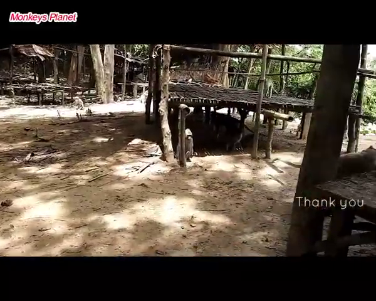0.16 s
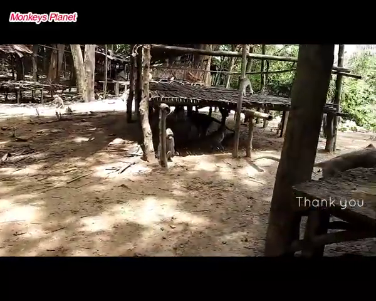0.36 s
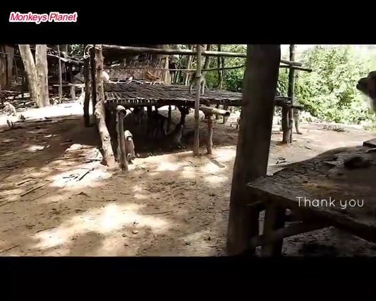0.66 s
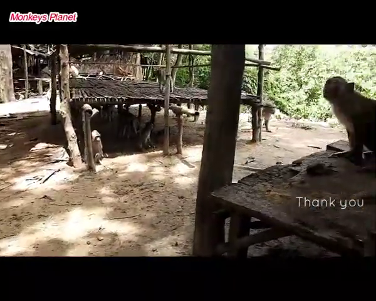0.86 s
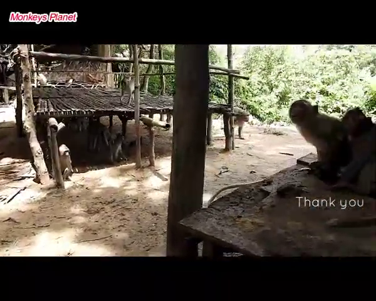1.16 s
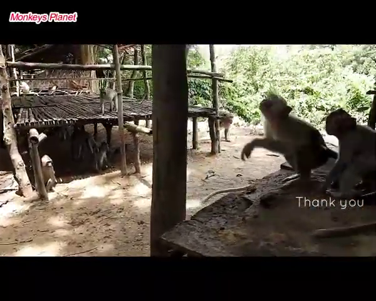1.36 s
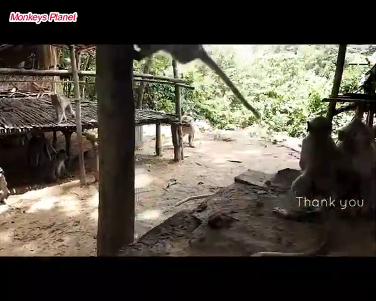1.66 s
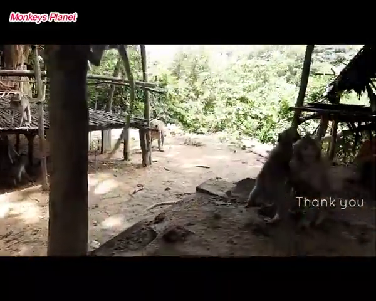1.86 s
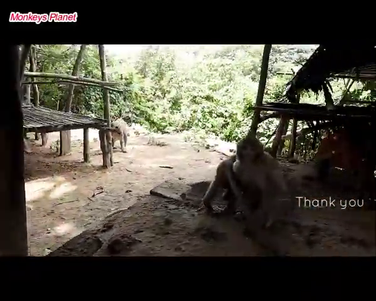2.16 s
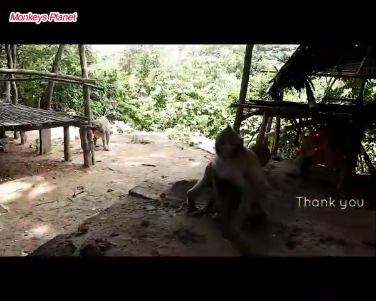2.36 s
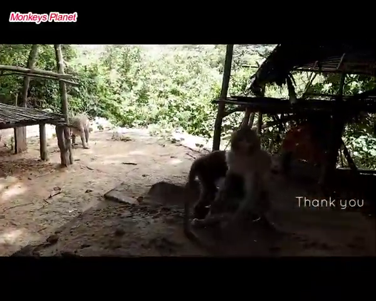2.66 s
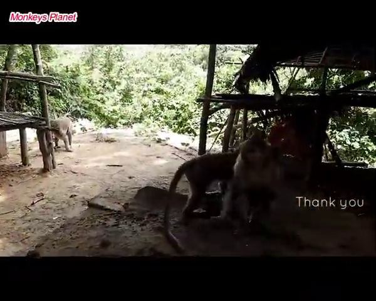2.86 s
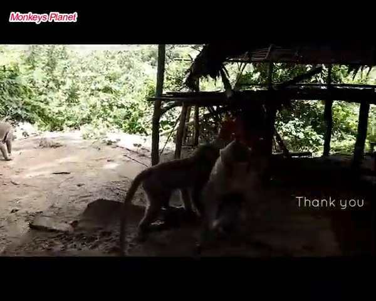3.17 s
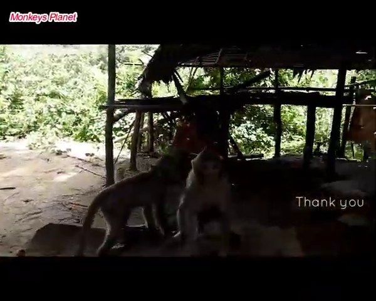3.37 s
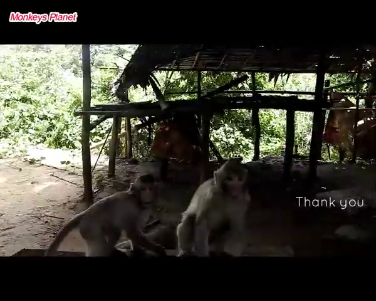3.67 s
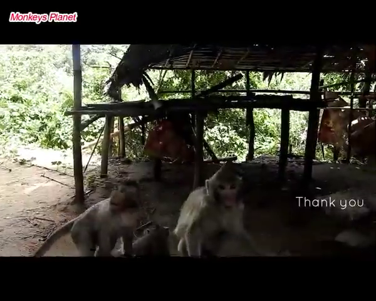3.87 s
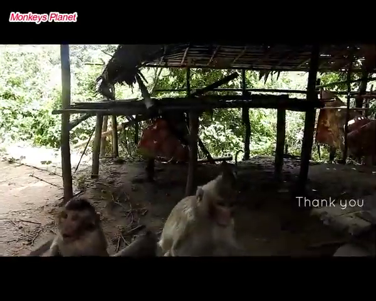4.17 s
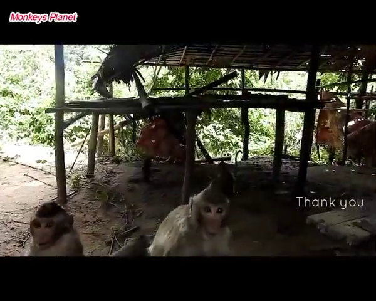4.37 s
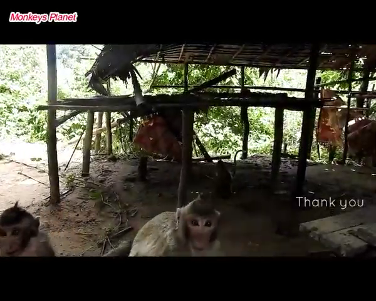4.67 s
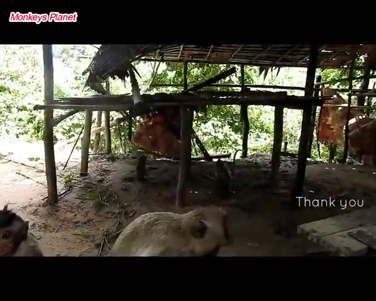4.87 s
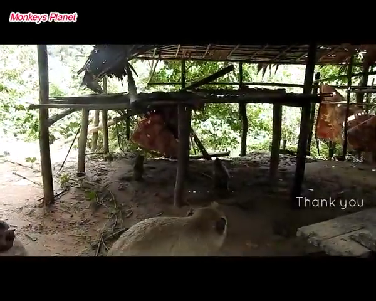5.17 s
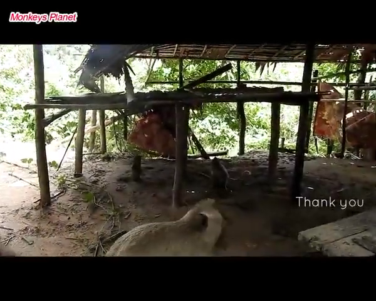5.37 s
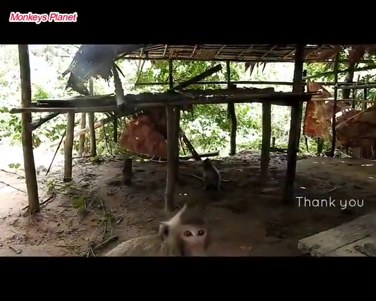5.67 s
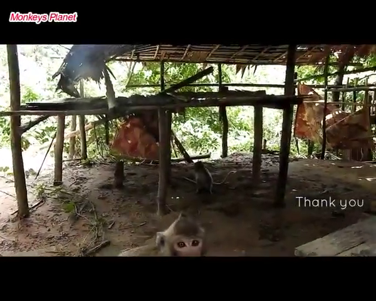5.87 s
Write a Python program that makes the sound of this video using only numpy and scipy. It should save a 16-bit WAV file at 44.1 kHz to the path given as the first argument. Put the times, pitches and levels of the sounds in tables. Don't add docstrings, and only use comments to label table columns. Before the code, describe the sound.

A young monkey shrieks harshly and yelps close by for four seconds outdoors, then only heavy wind buffets and small ticks remain.

```python
import sys
import numpy as np
from scipy import signal
from scipy.fft import rfft, irfft, next_fast_len
from scipy.io import wavfile
from scipy.ndimage import uniform_filter1d

SR = 44100
rng = np.random.default_rng(int(sys.argv[2]) if len(sys.argv) > 2 else 0)


def amp(db):
    return 10 ** (np.asarray(db, float) / 20)


def write(x):
    x = np.atleast_2d(x).T
    wavfile.write(sys.argv[1], SR, np.round(np.clip(x, -1, 1) * 32767).astype(np.int16))


N = 265638

USUAL_EFFORT_DB = -17
TURN_S = 2.4
CENTRED_S = 2.75


def evened(x):
    return x / np.sqrt(np.mean(x ** 2) + 1e-20)


def read(points, hz):
    f, value = np.transpose(points)
    return np.interp(np.log(hz + 1), np.log(f + 1), value)


def add(mix, start_s, sound):
    part = mix[..., max(round(start_s * SR), 0):][..., :sound.shape[-1]]
    part += sound[..., :part.shape[-1]]


def drift(count, smooth_s):
    size = max(round(smooth_s * SR), 1)
    return evened(uniform_filter1d(uniform_filter1d(rng.standard_normal(count), size), size))


def resonate(x, hz, width_hz):
    turn = np.exp(2j * np.pi * np.cumsum(hz * np.ones(len(x))) / SR)
    r = np.exp(-np.pi * width_hz / SR)
    low = signal.lfilter([1 - r], [1, -r], x / turn + 1e-18)
    return 2 * (turn * signal.lfilter([1 - r], [1, -r], low)).real


def monkey():
    # hz, level_db
    capsule = [(1400, -14), (2000, -1), (2300, 0.5), (13000, -0.5), (16000, -3)]
    # hz, difference_db
    port_balance = [(1400, 3), (2900, -5.5), (5500, 1), (15000, 0.5)]
    right_lead_s = 2.6e-5
    size = next_fast_len(N)
    hz = np.fft.rfftfreq(size, 1 / SR)
    voice = irfft(rfft(monkey_voice(), size) * amp(read(capsule, hz)), size)[:N]

    half = amp(read(port_balance, hz) / 2) * np.exp(-1j * np.pi * hz * right_lead_s)
    aside = irfft(rfft(voice, size) * np.array([half, 1 / half]), size)[:, :N]
    direct = np.where(np.arange(N) < CENTRED_S * SR, aside, voice)

    scatter = rng.standard_normal(700) * np.exp(-np.arange(700) / 250) * [[1], [-1]]
    near = signal.oaconvolve(voice[None], scatter / np.linalg.norm(scatter[0]), axes=1)[:, :N]
    return direct + amp(-6.5) * near + amp(-11.0) * shelter(voice)


def monkey_voice():
    # time_s, scream_effort_db, whistle_pitch_hz, whistle_level_db
    opening = [(0, -29, 5400, -21), (.045, -22.5, 5800, -23.5), (.095, -13, 6080, -34),
               (.11, -7.5, 5310, -43), (0.191, -12.5, 5550, -39), (.3, -18.5, 5082, -50),
               (.38, -15.5, 4910, -51), (0.464, -11, 4794, -61), (.485, -24, 4700, -50)]
    wavering = [(.735, -33, 5030, -29.5), (.765, -29, 5380, -20), (.83, -31.5, 5184, -29.5),
                (.91, -28, 5493, -20.5), (0.959, -18.5, 5480, -38), (1.019, -5.5, 5255, -23),
                (1.035, -26, 5310, -28.5), (1.069, -33, 5120, -26)]
    warbling = [(1.06, -21, 5844, -19.5), (1.111, -21.5, 5020, -24), (1.143, -18.5, 5344, -23),
                (1.151, -20, 6250, -20), (1.185, -19.5, 5650, -18), (1.2, -18, 4956, -24.5),
                (1.26, -14, 5214, -22), (1.31, -15, 5460, -23)]
    long_shriek = [(1.3, -15, 5530, -32), (1.421, -9.5, 5500, -49), (1.5, -7.5, 5860, -36),
                   (1.602, -13, 5720, -38), (1.69, -9.5, 5884, -45), (1.74, -14, 4964, -45),
                   (1.789, -15.5, 5355, -55), (1.813, -39, 5140, -48)]
    sinking = [(1.925, -42, 5696, -31), (1.96, -30, 5525, -23.5), (2.001, -22.5, 5435, -34),
               (2.04, -12, 5565, -21.5), (2.1, -13, 4890, -22), (2.16, -16, 5180, -24),
               (2.2, -26, 4760, -25), (2.281, -23.5, 4845, -25), (2.299, -52, 4590, -31)]
    first_yelp = [(2.472, -69, 6170, -26.5), (2.493, -44, 6640, -14.5), (2.513, -26, 6640, -17),
                  (2.522, -21.5, 5630, -27), (2.573, -23.5, 5750, -25), (2.581, -27, 5166, -20),
                  (2.615, -76, 5380, -24), (2.647, -60, 4400, -33)]
    second_yelp = [(2.879, -55, 6490, -22.5), (2.897, -35, 5940, -19.5), (2.916, -19.5, 5810, -22),
                   (2.97, -24.5, 5560, -27), (2.995, -53, 5740, -22.5), (3.02, -69, 4700, -38)]
    arched = [(3.157, -66, 7200, -31), (3.172, -30.5, 6664, -21), (3.188, -32, 5846, -25),
              (3.215, -26, 6390, -19), (3.255, -18, 6610, -17.5), (3.278, -19, 5710, -21.5),
              (3.342, -24, 4700, -24.5), (3.362, -46, 4980, -26), (3.381, -60, 4760, -37)]
    last = [(3.517, -55, 5510, -22), (3.528, -58, 5960, -20.5), (3.556, -17, 5220, -20.5),
            (3.63, -19, 5286, -45), (3.769, -21.5, 5216, -41), (3.84, -16.5, 5360, -29),
            (3.889, -17, 5170, -35), (3.939, -23, 3900, -37), (3.975, -38, 3720, -43)]
    # pitch_band_start_db, pitch_band_end_db, throat_db, lips_db
    postures = [(-9.5, -13, -2.5, -4), (-14.5, -19.5, -4.5, -6.5), (-20.5, -11.5, -1.5, -10),
                (-14, -15.5, -3, -15), (-6.5, -25.5, -3.5, -6), (-19, -16, -9, -12), (-16, -12, -13, -13.5),
                (-6.5, -19.5, -6, -9), (-12, -13, -2, -8)]
    octaves_db = [-12, -9, -13, -14, -10, -15, -20, -17, -11]
    # start_s, length_s, start_hz,
    # end_hz, peak_db
    side_tones = [(.019, .062, 8500, 8900, -20.5), (.742, 0.042, 6500, 7450, -24),
                  (.808, 0.073, 7280, 7350, -21.5), (.802, 0.058, 8900, 8700, -22.5),
                  (.848, 0.051, 8850, 8650, -20), (.892, 0.032, 8000, 8150, -23),
                  (.914, 0.031, 7550, 7600, -17.5), (.928, 0.032, 8600, 8900, -16),
                  (.825, .04, 2100, 2000, -35), (.945, 0.057, 2500, 2400, -34),
                  (.958, 0.044, 6000, 7700, -30), (1.06, 0.043, 9800, 9300, -20),
                  (1.124, 0.066, 9450, 9600, -18.5), (1.19, 0.028, 11000, 9250, -21),
                  (1.15, 0.061, 3800, 3700, -32.5), (1.16, .03, 2450, 2400, -29),
                  (1.215, 0.045, 2700, 2750, -27), (1.216, 0.035, 8050, 6200, -23),
                  (1.225, .05, 7500, 6600, -18), (2.1, 0.026, 7330, 7260, -13),
                  (1.1, .035, 5700, 5400, -22.5), (1.715, 0.0604, 7250, 6950, -12),
                  (1.67, .055, 2950, 2900, -22.5), (1.39, 0.079, 2650, 2300, -22),
                  (.965, .04, 8800, 8700, -22), (.95, 0.043, 6500, 6400, -26),
                  (1.13, 0.046, 8600, 8400, -24), (1.97, .04, 6100, 7000, -25),
                  (2.17, 0.0506, 6600, 7600, -25), (1.94, .04, 8300, 8200, -24),
                  (1.5, 0.068, 9200, 8400, -25),
                  (2.52, 0.055, 4300, 4250, -34.5), (2.51, 0.05, 9600, 10200, -31),
                       (2.575, 0.0145, 6300, 6850, -20), (2.915, 0.012, 7000, 7600, -24),
                       (2.935, 0.027, 7600, 6700, -21), (3.59, 0.045, 8700, 7550, -19),
                       (3.555, .04, 7500, 7900, -25), (3.675, 0.052, 6950, 6650, -18),
                       (3.73, .06, 6800, 6500, -22.5), (2.163, 0.043, 8500, 7800, -14),
                       (3.905, 0.04, 8800, 6500, -18), (1.743, 0.063, 4450, 4350, -22.5),
                       (1.973, 0.029, 8150, 9350, -16.5), (1.985, 0.029, 6200, 6750, -14.5),
                       (2.012, .03, 10800, 10750, -24), (2.527, 0.053, 7400, 7450, -15.5),
                       (2.955, 0.026, 7150, 6900, -20), (3.81, .03, 7800, 6300, -18),
                       (2.9, 0.076, 7200, 6000, -28), (3.6, 0.073, 6300, 5000, -23),
                       (2.578, .022, 10350, 10400, -22.5), (.955, .02, 13000, 13300, -28),
                       (3.56, .04, 4900, 6000, -21), (3.934, 0.042, 4900, 4000, -28.5)]
    # start_s, length_s, start_hz, end_hz, peak_db
    stacks = [
        (1.014, 0.058, 2680, 2540, -17),
        (2.097, 0.034, 2430, 2400, -28),
        (3.185, 0.0905, 2156, 2200, -20),
    ]
    # hz, level_db
    stack_colour = [(2400, -5), (4600, -17.5), (6500, 0.5), (7600, 16), (8800, -5.5), (11000, -9.5)]
    # (time_s, pitch_hz)
    third_cycles = [
        (-22.5, [(2.135, 1760), (2.165, 1710), (2.2, 1590), (2.285, 1620)]),
        (-21.5, [(3.255, 1800), (3.29, 1720), (3.345, 1640)]),
        (-16.5, [(3.82, 1680), (3.865, 1740), (3.89, 1700), (3.925, 1350), (3.96, 1270)]),
    ]

    voice = np.zeros(N)
    shrieks = (opening, wavering, warbling, long_shriek, sinking, first_yelp, second_yelp, arched, last)
    for rows, posture, octave_db in zip(shrieks, postures, octaves_db):
        add(voice, *scream(rows, *posture))
        add(voice, *whistle(rows, octave_db))
    for start_s, length_s, start_hz, end_hz, db in stacks:
        partials = [(k, read(stack_colour, k * start_hz)) for k in range(1, 6)]
        glide_hz = np.linspace(start_hz, end_hz, round(length_s * SR))
        add(voice, start_s, tone(glide_hz, db, partials, 0.53))
    for start_s, length_s, start_hz, end_hz, db in side_tones:
        glide_hz = np.linspace(start_hz, end_hz, round(length_s * SR))
        waver_hz = 70 * drift(len(glide_hz), .004)
        add(voice, start_s, tone(glide_hz + waver_hz, db, [(1, 0)], .3))
    for db, curve in third_cycles:
        add(voice, *thirds(db, curve))
    return voice


def scream(rows, low_start_db, low_end_db, throat_db, lips_db):
    # time_s, resonance_hz
    mouth_curve = [(0, 7420), (.12, 7140), (.24, 7760), (.36, 7170), (.74, 7350), (.85, 8220), (.97, 7780),
                   (1.14, 7940), (1.3, 7600), (1.45, 7380), (1.65, 7800), (1.73, 7280), (1.8, 7250),
                   (2.0, 7900), (2.12, 7650), (2.28, 7470), (2.55, 7430), (2.91, 7970), (2.97, 7100),
                   (3.22, 6930), (3.31, 7490), (3.6, 7440), (3.75, 6640), (3.87, 8100), (3.95, 6450)]
    s, effort_db, whistle_hz, _ = np.transpose(rows)
    start_s = s[0]
    aside = start_s < TURN_S
    t = np.arange(start_s, s[-1], 1 / SR)
    count = len(t)
    effort_db = np.interp(t, s, effort_db)
    pitch_hz = np.interp(t, s, whistle_hz) / 2
    mouth_hz = np.interp(t, *np.transpose(mouth_curve))
    low_db = np.linspace(low_start_db, low_end_db, count)

    push_db = np.clip(effort_db - USUAL_EFFORT_DB, -12, 10)
    throat_db = throat_db - 0.19 * push_db
    lips_db = lips_db - 0.8 * push_db

    pitch_hz = pitch_hz * (1 + .025 * drift(count, .015))
    turns = np.cumsum(pitch_hz * (1 + .07 * drift(count, .0008))) / SR
    folds = sum(np.cos(2 * np.pi * k * turns) for k in range(1, 5))
    folds = folds * (1 + .7 * drift(count, .0005))
    drive = (.6 if aside else .15) * evened(folds) + .6 * rng.standard_normal(count)

    focus = np.clip((low_db + 20) / 12, .1, .65) if aside else .1
    pitch_band = .7 * evened(resonate(drive, pitch_hz, 750)) + .7 * locks(drive, pitch_hz * 1.02, 200)
    chest = evened(resonate(drive, 2900 if aside else 2300, 2400))
    low = focus * evened(pitch_band) + .6 * chest

    torn = .65 if aside else .35
    throat = evened(evened(resonate(drive, 4900, 2300)) + torn * locks(drive, 5200, 600))
    mouth = evened(evened(resonate(drive, mouth_hz * .99, 2400)) + torn * locks(drive, mouth_hz, 550))

    air_level = .26 if start_s < 1.9 else .55 if start_s < CENTRED_S else .2
    air = air_level * amp(4 * drift(count, .02)) * evened(resonate(drive, 13400, 4500))
    lip_band = evened(resonate(drive, 5600 + .6 * mouth_hz, 2000))
    lips = evened(lip_band + .7 * torn * locks(drive, 5000 + .6 * mouth_hz, 800) - air)

    voice = amp(low_db) * low - amp(throat_db - 8.5) * throat + mouth - amp(lips_db - 5.0) * lips
    flutter = amp(0.42 * drift(count, 0.027))
    return start_s, amp(effort_db + 1.5) * flutter * voice * signal.windows.tukey(count, .04)


def locks(drive, hz, spread_hz):
    count = len(drive)
    out = 0
    for _ in range(2):
        hops = np.cumsum(rng.random(count) < 55 / SR)
        hop_hz = uniform_filter1d(rng.standard_normal(count)[hops], size=220) * spread_hz
        hop_hz = hop_hz + 60 * drift(count, 0.004)
        out = out + resonate(drive, hz + hop_hz, 230) * amp(4.0 * drift(count, .008))
    return evened(out)


def whistle(rows, octave_db):
    s, *columns = np.transpose(rows)
    t = np.arange(s[0], s[-1], 1 / SR)
    effort_db, pitch_hz, db = (np.interp(t, s, c) for c in columns)
    ragged = np.minimum(amp(effort_db - USUAL_EFFORT_DB), 1)
    waver_hz = 45 * drift(len(t), .006) + ragged * 160 * drift(len(t), .003)
    tremble_db = (1.5 + ragged * 4) * drift(len(t), .007)
    octave_db = octave_db - np.maximum(pitch_hz - 5500, 0) / 150
    return s[0], tone(pitch_hz + waver_hz, db + tremble_db, [(1, 0), (2, octave_db)], .03)


def tone(pitch_hz, db, partials, edge):
    count = len(pitch_hz)
    turns = np.cumsum(pitch_hz + 50 * drift(count, .002)) / SR
    wave = sum(amp(k_db + 1.34 * drift(count, 0.0023)) * np.sin(2 * np.pi * k * turns)
               for k, k_db in partials)
    return amp(db) * wave * signal.windows.tukey(count, edge)


def thirds(db, curve):
    # hz, level_db
    thirds_colour = [(2600, -5.5), (3400, -14), (5000, -8), (6700, 0), (8300, -2.5), (10000, -11),
                     (11500, -19)]
    s, hz = np.transpose(curve)
    pitch_hz = np.interp(np.arange(s[0], s[-1], 1 / SR), s, hz)
    count = len(pitch_hz)
    out = 0
    for k in range(2, 8):
        level = amp(read(thirds_colour, k * pitch_hz) + 2.1 * drift(count, 0.0068))
        ragged_hz = k * pitch_hz + 95 * drift(count, 0.0026)
        out = out + level * tone(ragged_hz, db, [(0.99, 0)], 0.35)
    return s[0], out


def shelter(x):
    # hz, t60_s
    decay = [(2000, .4), (7000, .45), (12000, .2)]
    taps = np.zeros((2, SR))
    at = np.arange(200, SR - 20, 20) + rng.integers(0, 20, (2, (SR - 201) // 20))
    np.put_along_axis(taps, at, rng.choice([-1., 1.], at.shape), 1)
    hz, t, z = signal.stft(taps, SR, nperseg=256)
    tail = signal.istft(z * amp(-60 * t / read(decay, hz)[:, None]), SR, nperseg=256)[1]
    return signal.fftconvolve(x[None], tail / np.linalg.norm(tail[0]), axes=1)[:, :N]


def wind():
    # time_s, left_db, right_db
    steady = [(0.0, -34.5, -55), (0.5, -32.5, -35), (1.0, -21, -25.5), (1.5, -24, -53), (2.0, -31, -51),
              (2.5, -27.5, -35), (3.0, -41, -36), (3.5, -29.5, -47), (4.0, -22.5, -28.5), (4.5, -19, -23),
              (5.0, -19, -30.5), (5.5, -18.5, -16), (6.0, -12.5, -35)]
    # hz, density_db
    rumble_colour = [(12, -48), (20, -40.5), (59, 22), (102, 1), (177, -3), (222, -35), (258, -27),
                     (400, -45), (520, -68), (880, -120)]
    # peak_s, peak_db, width_s
    left_buffets = [(0.735, -13, 0.023), (0.766, -11, 0.018), (.81, -16.5, .02), (0.872, -20.5, .028),
                    (.938, -14.5, 0.04), (1.402, -11.5, 0.018), (1.64, -19.5, .03), (1.888, -15.5, .015),
                    (2.014, -19.5, .012), (2.142, -13, 0.02), (2.281, -12.5, 0.012), (2.441, -17, 0.037),
                    (2.7, -21.5, .02), (2.827, -13.5, 0.011), (2.917, -8, 0.018), (3.021, -13.5, 0.016),
                    (3.564, -7, 0.024), (4.252, -7.5, 0.012), (4.286, -12.5, 0.023), (4.359, -7, .04),
                    (4.487, -5, 0.016), (5.531, -2.5, 0.017), (5.56, -4.5, 0.024), (5.586, -4, 0.015),
                    (5.718, -11.5, 0.061), (5.78, -.5, 0.051), (5.993, -5.5, 0.029)]
    # peak_s, peak_db, width_s
    right_buffets = [(0.711, -9, 0.006), (0.735, -10.5, .012), (1.315, -16, 0.028), (2.843, -22, 0.022),
                     (3.577, -9.5, 0.031), (3.635, -11.5, .03), (3.702, -12, 0.065), (3.757, -13, 0.022),
                     (3.959, -12, 0.024), (4.344, -7.5, 0.06), (4.376, -12, 0.012), (4.69, -14, 0.019),
                     (4.807, -15, 0.035), (5.261, -16.5, .032), (5.407, -11.5, 0.044), (5.442, -11.5, .013),
                     (5.529, -15.5, 0.029), (5.592, -1.5, .028), (5.618, -4.5, 0.019), (5.69, -7.5, 0.084),
                     (5.754, -4, 0.03), (5.818, -0.5, 0.046), (5.842, 0, 0.013), (5.944, -18, 0.019),
                     (6.003, -1, 0.013)]
    s, *levels_db = np.transpose(steady)
    out = two_port_noise(rumble_colour, [(1000, 0.39)], patchy_db=4.5)
    for port, db, buffets in zip(out, levels_db, (left_buffets, right_buffets)):
        port *= amp(np.interp(np.arange(N) / SR, s, db) + 4.5 * drift(N, .02) - 2.5)
        for peak_s, peak_db, width_s in buffets:
            add(port, peak_s - 1.5 * width_s, buffet(peak_db, width_s))
    spit = np.clip(out - .35, 0, .25) ** 2 * amp(5.1 * drift(N, 0.01))
    spit = signal.lfilter(*signal.butter(1, [330, 1300], "band", fs=SR), spit)
    out = .75 * np.tanh(out / .75) + amp(-1) * spit
    return signal.lfilter(*signal.butter(5, 46, "high", fs=SR), out)


def buffet(peak_db, width_s):
    eddy_hz = 142.36 + 3.0 * peak_db
    t = np.arange(-1.5 * width_s, 2.7 * width_s, 1 / SR)
    wobble = 1 + 0.317 * drift(len(t), 0.00473)
    phase = 2 * np.pi * (rng.random() + np.cumsum(eddy_hz * wobble) / SR)
    rough = resonate(rng.standard_normal(len(t)), 1.15 * eddy_hz, 110)
    rough = evened(resonate(rough, 1.15 * eddy_hz, 110))
    eddies = .4 * rough + .85 * np.sin(phase) + amp(0.99 * peak_db - 10) * np.cos(2 * phase)
    return amp(peak_db + 3.5) * np.exp(-2.4 * (t / width_s) ** 2) * eddies


def two_port_noise(colour, likeness, patchy_db):
    frames, hz = N // 256 + 5, np.fft.rfftfreq(1024, 1 / SR)
    a, b, c, d, patches = rng.standard_normal((frames, 513, 5)).T
    patches = evened(uniform_filter1d(uniform_filter1d(patches, size=10, axis=0), size=8, axis=1))
    same = np.clip(read(likeness, hz), -1, 1)[:, None]
    left = a + 1j * b
    z = np.array([left, same * left + np.sqrt(1 - same ** 2) * (c + 1j * d)])
    z *= amp(read(colour, hz)[:, None] + patchy_db * patches)
    return evened(signal.istft(z, nperseg=1024, noverlap=768)[1][:, :N])


def pops():
    # start_s, peak_db, left_right_db
    snaps = [(0.014, -19, 1.5), (0.728, -22, 12), (2.913, -29, 8.5), (4.338, -13, -2), (4.36, -18, 11.5),
             (4.484, -27, 12.0), (5.525, -20, 9), (5.551, -29, 4.5), (5.585, -23, -9.5), (5.619, -25, -6.0),
             (5.683, -11, -7), (5.751, -24, -4.0), (5.782, -10, -4), (5.799, -30, 0.0), (5.822, -25, -6.0),
             (5.991, -30, 0.5)]
    fall_s = 0.0006
    out, t = np.zeros((2, N)), np.arange(-.006, .006, 1 / SR)
    for start_s, db, pan_db in snaps:
        port_db = np.clip([[pan_db / 2], [-pan_db / 2]], -9, 4)
        add(out, start_s - .004, -amp(db + 9.0 + port_db) * np.exp(-abs(t) / fall_s))
    return signal.lfilter(*signal.butter(1, [150, 1300], "band", fs=SR), out)


def ticks():
    # start_s, peak_db, pitch_hz, t60_s
    taps = [(0.014, -24.5, 950, 0.044), (0.447, -27.5, 1060, 0.091), (2.014, -35, 536, 0.15),
            (5.289, -37, 1960, 0.037), (5.311, -36, 1850, 0.028), (5.404, -38, 1010, 0.083),
            (5.473, -27, 2210, 0.038), (5.49, -36, 5030, 0.13), (5.539, -30, 4600, 0.035),
            (5.63, -33.5, 1750, 0.027), (5.935, -40, 2600, 0.061), (5.944, -37, 1840, 0.032)]
    out, t = np.zeros((2, N)), np.arange(3000) / SR
    for start_s, db, hz, t60_s in taps:
        grit = evened(resonate(rng.standard_normal(len(t)), hz, .9 * hz))
        add(out, start_s, amp(db + 6.0 - 60 * t / t60_s) * grit * amp([[1.5], [-1.5]]))
    return signal.lfilter(*signal.butter(3, 8000, fs=SR), out)


def forest():
    # hz, density_db
    wash_colour = [(150, 5.5), (250, -1.5), (517, -9), (604, -7), (670, -6), (1310, -10.5), (2450, -12),
                   (2910, -12.5), (5710, -12.5), (6670, -6), (8950, -24), (15600, -51.5)]
    # hz, likeness
    wash_likeness = [(60, 0.06), (180, 0.98), (550, 0.9), (1650, 0.92), (4970, 0.46), (15000, 0.042)]
    wash = two_port_noise(wash_colour, wash_likeness, patchy_db=.5)
    throb = amp(4.5 * drift(N, 0.0026))
    insect = np.array([evened(resonate(rng.standard_normal(N), 6730, 170) * throb) for _ in range(2)])
    return amp(-32.5) * (wash + amp(-13.0) * insect)


def scene():
    return monkey() + wind() + pops() + ticks() + forest()


def roll_off(x):
    return signal.sosfilt(signal.butter(12, 15800, fs=SR, output="sos"), x)


def record(dry):
    power_db = 10 * np.log10(abs(uniform_filter1d((dry ** 2).max(0), size=500)) + 1e-12)
    fall_db = np.arange(N) * 240.0 / SR
    held_db = np.maximum.accumulate(power_db + fall_db) - fall_db
    over_db = np.maximum(held_db + 12.0, 0)
    ducked = dry / amp(0.72 * uniform_filter1d(over_db, size=300))
    mix = .97 * np.tanh(ducked / .97)
    return roll_off(mix)


dry = scene()
out = record(dry)
write(out)
```